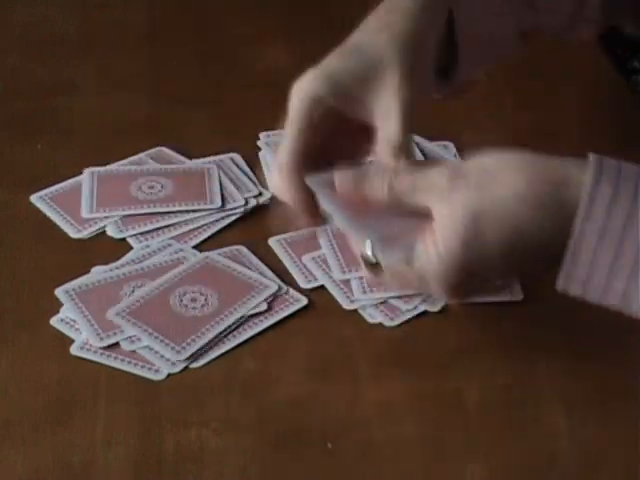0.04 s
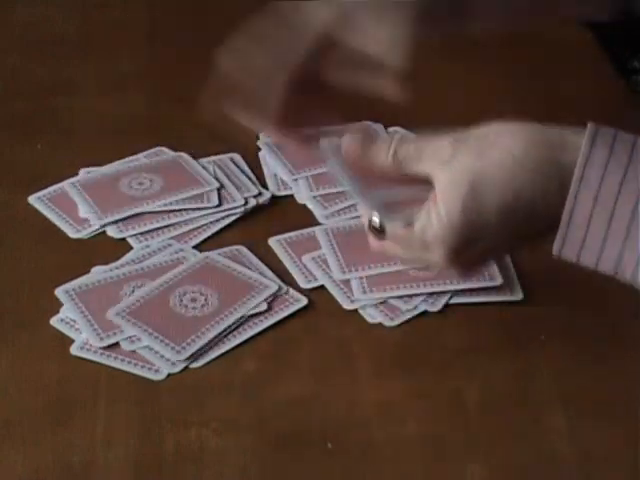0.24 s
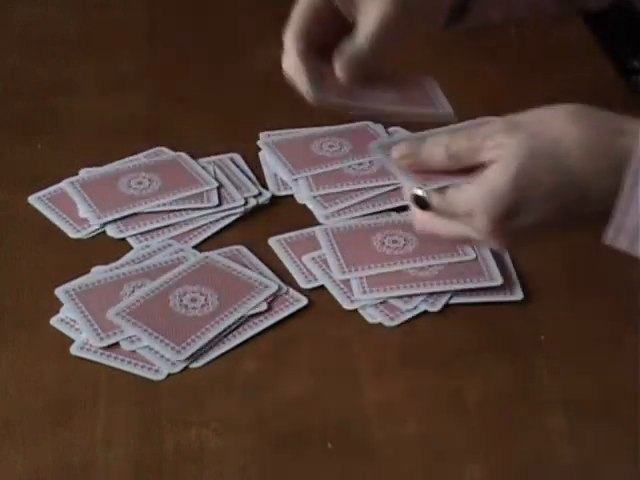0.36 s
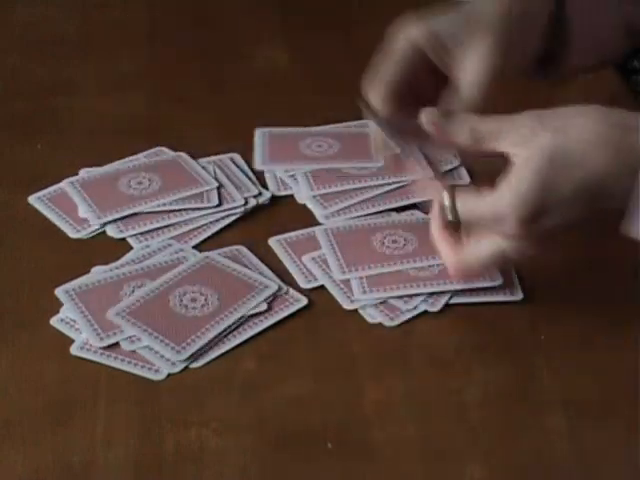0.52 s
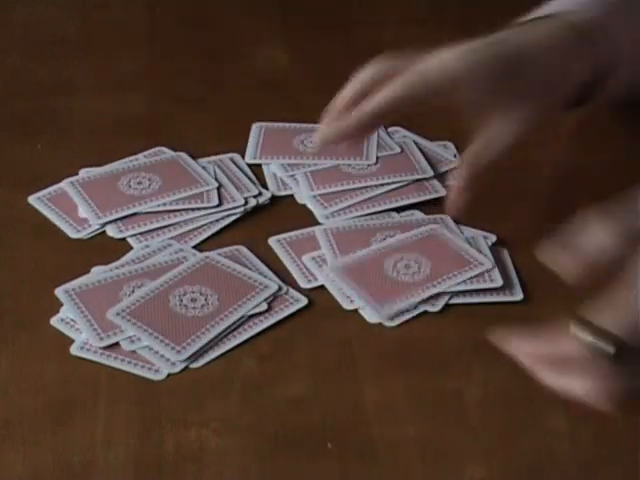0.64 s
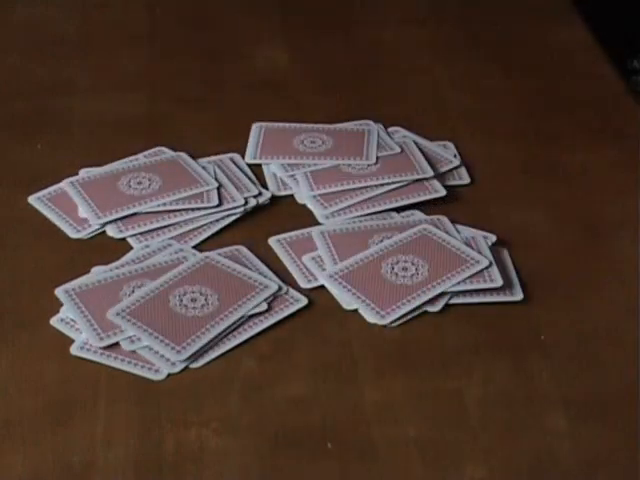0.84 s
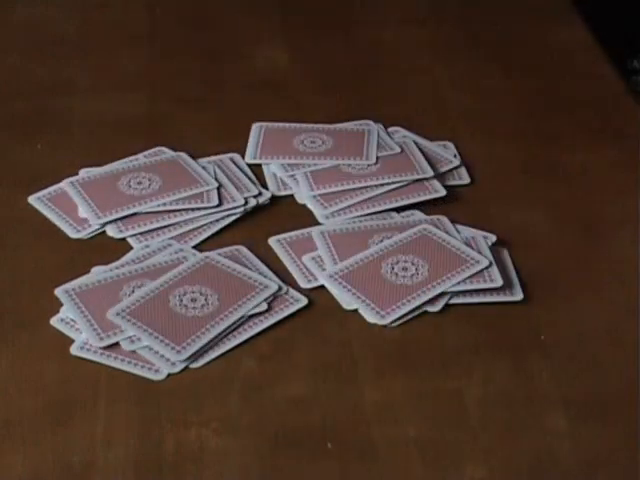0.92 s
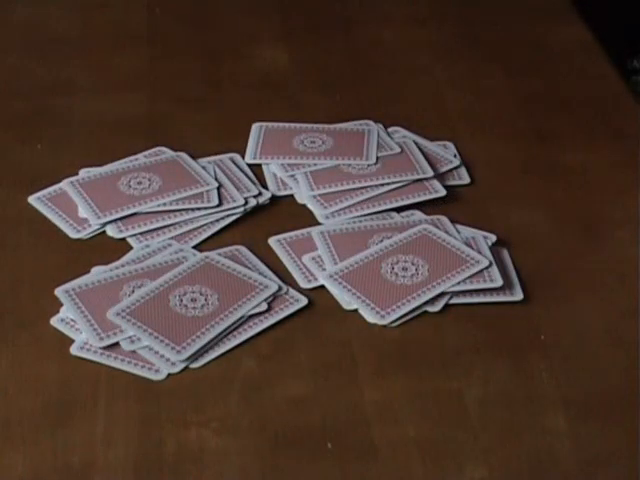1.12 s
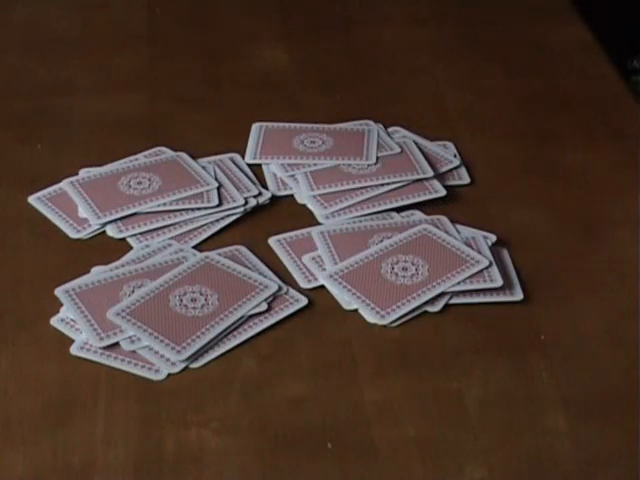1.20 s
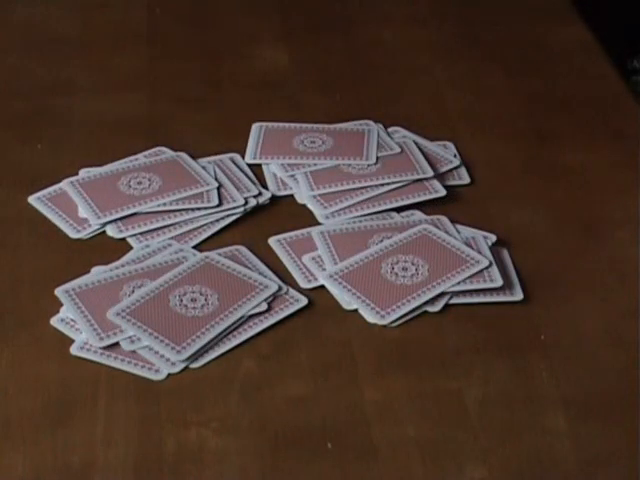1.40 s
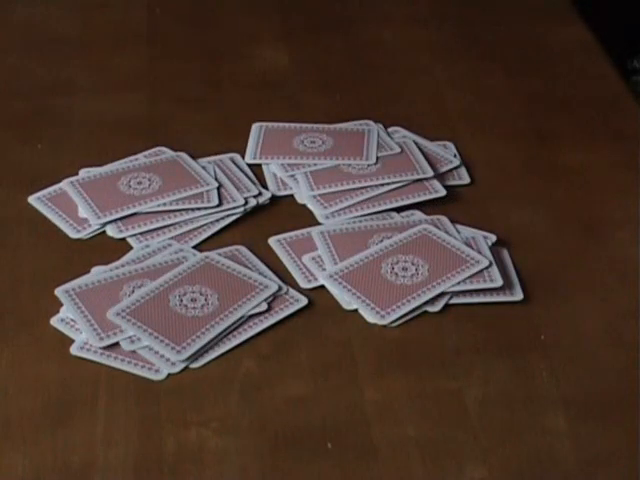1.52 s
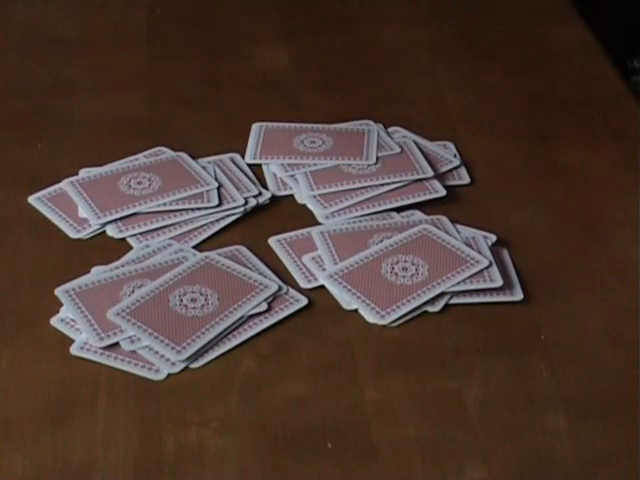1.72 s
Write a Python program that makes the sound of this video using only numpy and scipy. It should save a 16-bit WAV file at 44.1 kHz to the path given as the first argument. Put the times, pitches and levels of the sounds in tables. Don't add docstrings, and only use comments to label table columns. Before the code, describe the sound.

Fast card dealing: crisp snaps, ticks and papery scrapes, ending in a quiet room with motor whir

```python
import sys
import numpy as np
from scipy import signal
from scipy.fft import rfft, irfft, next_fast_len
from scipy.io import wavfile
from scipy.ndimage import uniform_filter1d, map_coordinates

SR = 44100
rng = np.random.default_rng(int(sys.argv[2]) if len(sys.argv) > 2 else 0)


def unload_wav(signal):
    wavfile.write(
        sys.argv[1],
        SR,
        np.round(np.clip(np.atleast_2d(signal).T, -1, 1) * 32767).astype(np.int16),
    )


def ratio_of_db(decibels):
    return 10 ** (np.asarray(decibels, float) / 20)


N = 77175


def unit(x):
    return x / np.sqrt(np.mean(x ** 2) + 1e-20)


def along(points, hz):
    f, value = np.transpose(points)
    return np.interp(np.log(hz + 1), np.log(f + 1), value)


def wobble(rate, size=N):
    knots = rng.standard_normal(int(N * rate / SR) + 4)
    return map_coordinates(knots, [np.arange(size) * rate / SR], order=3)


def filtered(x, response):
    m = next_fast_len(x.shape[-1] + 4096)
    spectrum = rfft(x, m) * response(np.fft.rfftfreq(m, 1 / SR))
    return irfft(spectrum, m)[..., :x.shape[-1]]


def add(out, s, piece):
    part = out[..., max(round(s * SR), 0):][..., :piece.shape[-1]]
    part += piece[..., :part.shape[-1]]


def rings(rows, rise_s, waver):
    out, u = np.zeros(N), np.arange(SR // 12) / SR
    cycles = np.arange(300)
    for s, db, hz, t60 in rows:
        walk = np.cumsum(rng.standard_normal(300)) * (cycles > 0)
        drift = waver * np.interp(u * hz, cycles, walk)
        envelope = ratio_of_db(db - 60 * u / t60) * (1 - np.exp(-u / rise_s))
        add(out, s, envelope * np.sin(2 * np.pi * hz * u + drift))
    return out


def corner_pops():
    flicks = [(.2255, -34, 2150, 0.0051), (.2170, -34, 1930, .012), (.2310, -36, 2600, .015),
              (.24762, -10.5, 6450, 0.0017), (.24784, 2.5, 2250, 0.0017), (.24788, -19, 840, 0.008),
              (.2489, -20, 2380, 0.01), (.3469, -33, 3300, 0.007), (.4291, -28, 2100, .008),
              (.4347, -26, 1900, .008), (.4966, -21, 2930, 0.01), (.4973, -16.5, 3220, 0.0063),
              (.4973, -19.5, 1224, 0.01), (.5039, -31, 2620, 0.0053), (.5571, -43, 1620, 0.01),
              (.5733, -31, 2780, 0.008), (.5733, -23, 5190, 0.0086), (.6041, -43.5, 2120, 0.021),
              (.6501, -29.5, 3550, 0.008), (.6503, -22.5, 954, 0.0079), (.6545, -30, 700, 0.0085),
              (.7674, -36, 2950, 0.018), (.7691, -40, 970, 0.017), (.4985, -22, 1880, 0.0083),
              (.6508, -31, 590, 0.018), (.6503, -33, 2650, 0.007), (.3310, -40, 1120, 0.02),
              (.0030, -37.5, 4750, 0.016), (.0060, -40.5, 2050, 0.026), (.0250, -40.5, 3740, 0.017),
              (.2480, -16, 3540, 0.0011), (.4981, -28, 626, 0.017)]
    low_hz = 456
    ringing = rings(flicks, rise_s=0.0001, waver=0.1)
    return filtered(ringing, lambda f: (1j * f / (low_hz + 1j * f)) ** 2)


def paper(tilt_db, above_hz):
    # (frequency [Hz], level [dB])
    card = [(300, 1.5), (700, 1.5), (2000, 0.5), (5000, -7.5), (8500, -10), (11000, -15), (13500, -18),
            (15500, -52)]
    spread = 0.22

    def shape(hz):
        tilt = tilt_db * np.log2((hz + 1) / 4000)
        return ratio_of_db(along(card, hz) + tilt) * hz / np.hypot(hz, above_hz)

    mid, side = filtered(rng.standard_normal((2, SR // 10)), shape)
    return unit(np.array([mid + spread * side, mid - spread * side]))


def cracks():
    # (time [s], rms level [dB], t60 [s], tilt [dB per octave])
    bursts = [(0.03, -46, 0.016, 2), (0.1098, -31.5, .008, 1.5), (.1120, -39, 0.019, -0.5),
              (.1910, -36.5, 0.012, 3), (0.2473, -33, 0.02, -4), (0.3306, -36, 0.011, 6),
              (0.338, -35, 0.014, 7), (0.3464, -30, 0.0043, 5), (0.349, -26, 0.0061, 3),
              (0.429, -37, 0.0085, 12), (.4346, -30, 0.0062, 8), (0.441, -36, 0.0055, -5),
              (0.498, -29.5, 0.018, -5), (0.5732, -20.5, 0.0069, 6.5), (0.5829, -30, 0.0097, 2),
              (0.6499, -29.5, 0.014, -1.5), (0.7666, -33.5, 0.0094, 2.5), (0.8291, -35, 0.0026, -4),
              (1.3266, -39, 0.003, -3)]
    rise_s = 0.000098
    out, u = np.zeros((2, N)), np.arange(SR // 10) / SR
    for s, db, t60, tilt_db in bursts:
        envelope = ratio_of_db(db - 60 * u / t60) * (1 - np.exp(-u / rise_s))
        add(out, s, envelope * paper(tilt_db, above_hz=3400))
    return out


def edge_rings():
    # (time [s], peak level [dB], pitch [Hz], t60 [s])
    edges = [(.1095, -37, 9250, .006), (.1096, -34, 7130, .007), (.1098, -39, 3120, 0.0073),
             (.1126, -41, 8500, .008), (.3302, -35.5, 6900, .008), (.3303, -36, 8600, .008),
             (.3469, -23, 6400, .003), (.3469, -24, 9200, .003), (.3468, -33, 1600, .006),
             (.3491, -34, 3500, .006), (.4291, -31, 5600, .006), (.4293, -31, 6500, .006),
             (.4297, -40, 9400, .005), (.4346, -24.5, 9400, 0.0043), (.4351, -27.5, 1020, 0.0079),
             (.4398, -30, 2100, 0.011), (.4398, -34, 5800, .006), (.4972, -30, 5300, 0.0058),
             (.4974, -40, 7450, .005), (.5732, -18, 8500, 0.0056), (.5733, -29, 7040, .005),
             (.5733, -29, 9870, .005), (.5738, -30.5, 2410, 0.018), (.5829, -33, 5500, 0.0046),
             (.5836, -34, 8250, .014), (.5829, -36, 7000, .005), (.6500, -29.5, 6600, .008),
             (.6503, -33, 9650, .007), (.6501, -38, 8000, .006), (.6455, -37, 3120, .006),
             (.7665, -38, 7300, 0.0076), (.2490, -28, 5750, 0.0068)]
    return rings(edges, rise_s=0.0001, waver=0.1)


def pats():
    # (time [s], peak level [dB], pitch [Hz], t60 [s])
    touches = [(.1100, -35, 294, .035), (.2012, -27, 430, .06), (.1990, -35, 1100, .015),
               (.2062, -33, 850, .018), (.2205, -39, 980, .02), (.3240, -38, 640, .06),
               (.3110, -38, 330, .03), (.3370, -36, 620, .03), (.3455, -36, 400, .03),
               (.5730, -32, 460, .025), (.5750, -39, 310, .03), (.3300, -44, 2000, .02)]
    return rings(touches, rise_s=0.00075, waver=0.2)


def slides():
    # (time [s], length [s], rms level [dB], tilt [dB per octave])
    strokes = [(0, 0.01, -48, 2), (0.018, 0.011, -46.5, 3.5), (0.196, 0.033, -41, -1.5),
               (0.214, 0.013, -44.5, 4), (0.235, 0.013, -39, 3.5), (0.255, 0.023, -43.5, -3),
               (0.321, 0.041, -45.5, -0.5), (0.425, 0.028, -42, 0.5), (0.459, 0.034, -43.5, 2),
               (0.505, 0.011, -42.5, -2), (0.548, 0.028, -45.5, -0.5), (0.571, 0.024, -45, 2)]
    fade_s = 0.0066
    out, u = np.zeros((2, N)), np.arange(SR // 10) / SR
    for s, length, db, tilt_db in strokes:
        onset = np.clip(u / fade_s + 0.42, 0, 1)
        release = np.exp(-np.clip(u - length, 0, None) / fade_s)
        add(out, s, ratio_of_db(db) * onset * release * unit(paper(tilt_db, above_hz=250)))
    return out


def room(x):
    # (frequency [Hz], t60 [s])
    decay = [(300, 0.31), (2000, 0.12), (10000, 0.081)]
    wall_s, wall_db, late_db = 0.0064, -18.5, -15.5
    hz, t, z = signal.stft(rng.standard_normal((2, SR // 3)), SR, nperseg=256)
    dying = z * ratio_of_db(-60 * t / along(decay, hz)[:, None])
    tail = signal.istft(dying, SR, nperseg=256)[1]
    tail = tail / np.linalg.norm(tail[0])
    delayed = np.pad(x, (round(wall_s * SR), 0))
    late = signal.fftconvolve(delayed[None], tail, axes=1)[:, :N]
    wall = filtered(x, lambda f: -np.exp(-2j * np.pi * f * wall_s) / (1 + 1j * f / 4000))
    return ratio_of_db(late_db) * late + ratio_of_db(wall_db) * wall


def whir_noise():
    patch_db = 1
    z = signal.stft(rng.standard_normal((2, N)), nperseg=512)[2]
    field = uniform_filter1d(rng.standard_normal(z.shape[1:]), size=5, axis=0)
    field = uniform_filter1d(field, size=8, axis=1)
    return unit(signal.istft(z * ratio_of_db(patch_db * unit(field)), nperseg=512)[1][:, :N])


def gear_teeth(meshes):
    worn_db = [5, -3, 2, -6, 0, -2]
    scatter_s, spread_db, level_db = 0.00008, 1.5, -4
    above_hz, dull_hz = 3000, 8500
    at = np.flatnonzero(np.diff(np.floor(meshes)))
    late, force = rng.standard_normal((2, N))[:, :len(at)]
    at = np.clip(at + np.round(scatter_s * SR * late).astype(int), 0, N - 1)
    force_db = spread_db * force + np.resize(worn_db, len(at))
    teeth = unit(np.bincount(at, ratio_of_db(force_db), N))

    def mechanism(hz):
        highpass = (hz / np.hypot(hz, above_hz)) ** 4
        dispersion = np.exp(1j * (hz / 1500) ** 2)
        notch = 1 - np.exp(-((hz - dull_hz) / 1300) ** 2)
        return ratio_of_db(level_db) * highpass * dispersion * notch

    return filtered(teeth, mechanism)


def drive():
    # (frequency [Hz], level [dB])
    whir = [(20, -12), (90, -9.5), (190, -6.5), (450, -13), (1000, -8.5), (1600, -15), (6000, -18.5),
            (8500, -26), (14500, -41.5)]
    # (frequency [Hz], width [Hz], lift [dB])
    casing = [(308, 42, 6), (997, 42, 3.5), (1950, 190, 4), (3690, 206, 5), (5220, 360, 5),
              (6840, 310, 3.5), (10670, 530, 9), (4750, 370, -3.5)]
    # (frequency [Hz], left-right likeness [-1 to 1])
    alike = [(60, 0.64), (240, 0.21), (940, -0.24), (3690, 0.65), (14600, 0.023)]
    gear_hz, gear_drift_hz, gear_depth = 299, 9, 0.27
    meshes = np.cumsum(gear_hz + gear_drift_hz * wobble(22)) / SR
    pair = whir_noise() * (1 + gear_depth * np.sin(2 * np.pi * meshes))
    teeth = gear_teeth(meshes)

    def radiation(hz):
        lift = sum(db / (1 + ((hz - c) / w) ** 2) for c, w, db in casing)
        angle = np.arccos(np.clip(along(alike, hz), -1, 1)) / 2
        return ratio_of_db(along(whir, hz) + lift) * [np.cos(angle), np.sin(angle)]

    mid, side = filtered(pair + [teeth, 0 * teeth], radiation)
    return ratio_of_db(-50) * unit(np.array([mid + side, mid - side]))


def hum():
    # (frequency [Hz], rms level [dB])
    tones = [(288, -71), (816, -65.5), (188, -73)]
    swell_db, wander, waver = 1.5, 0.5, 0.45
    t, out = np.arange(N) / SR, np.zeros(N)
    for hz, db in tones:
        swell = swell_db * (2 * t - 3 + wander * wobble(7.0))
        phase = 2 * np.pi * hz * t + waver * wobble(25.06)
        out += ratio_of_db(db + 3 + swell) * np.sin(phase)
    return out


def drive_ticks():
    # (time [s], peak level [dB])
    knocks = [(0.7452, -44.5), (0.8919, -48), (1.0001, -44.5), (1.0854, -49), (1.1508, -43.5),
              (1.1650, -44), (1.2190, -48), (1.232, -45), (1.3628, -60), (1.3735, -45), (1.5209, -49.5)]
    pitch_hz, t60_s, lift_db = 2100, 0.021, 3
    rows = [(s, db + lift_db, pitch_hz, t60_s) for s, db in knocks]
    return rings(rows, rise_s=0.0007, waver=0.4)


def rumble(s, half, db, hz):
    band = lambda f: np.exp(-np.log((f + 1) / hz) ** 2 / 0.15)
    low = unit(filtered(rng.standard_normal(N), band))
    return ratio_of_db(db) * low * np.exp(-((np.arange(N) / SR - s) / half) ** 2)


def background_rumbles():
    # (time [s], half length [s], rms level [dB], frequency [Hz])
    sleeve = (.06, .12, -62, 40)
    far_rumble = (1.66, .15, -59, 175)
    return rumble(*sleeve) + rumble(*far_rumble)


def pan(db):
    return ratio_of_db(np.array([[db / 2], [-db / 2]]))


def scene():
    low_hz, high_hz = 318, 11400
    strikes = edge_rings() + pats() + cracks() + slides()
    cards = corner_pops() * pan(-2.5) + strikes * pan(-0.1)

    def card_radiation(f):
        return (1j * f / (low_hz + 1j * f)) ** 2 / np.sqrt(1 + (f / high_hz) ** 12)

    cards = filtered(cards, card_radiation)
    camera = drive() + hum() + drive_ticks()
    return cards + room(cards.mean(0)) + camera + background_rumbles()


def top_cut(x):
    return signal.sosfilt(signal.butter(12, 15180, fs=SR, output="sos"), x)


def record(dry):
    return top_cut(dry)


dry = scene()
out = record(dry)
unload_wav(out)
```